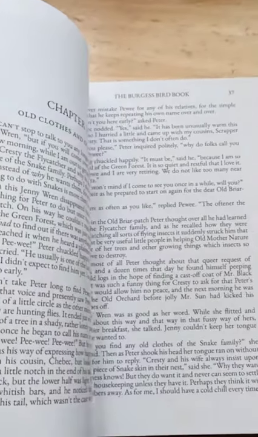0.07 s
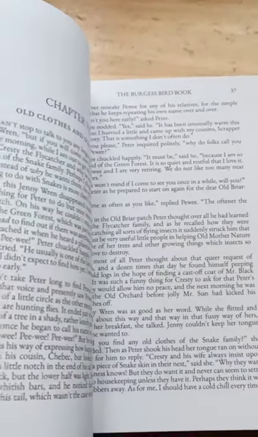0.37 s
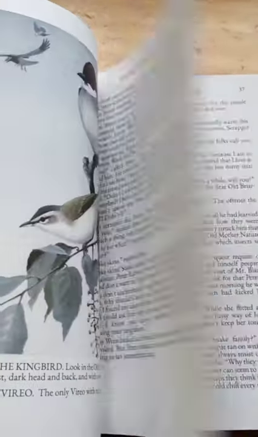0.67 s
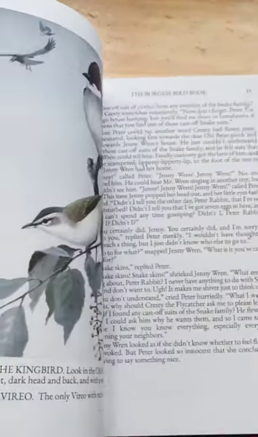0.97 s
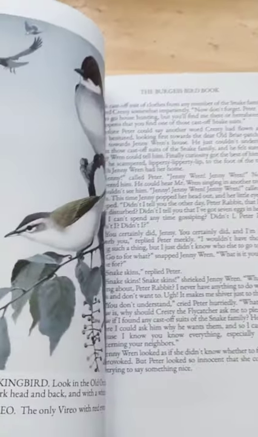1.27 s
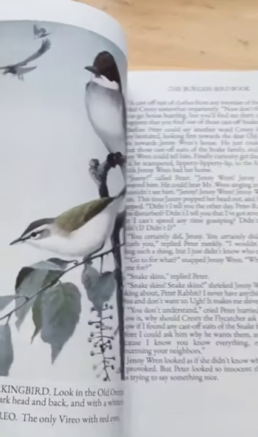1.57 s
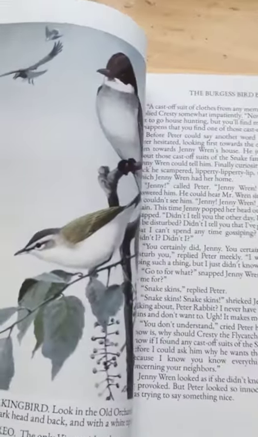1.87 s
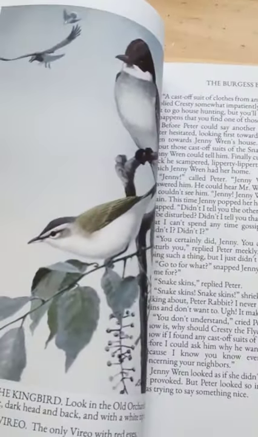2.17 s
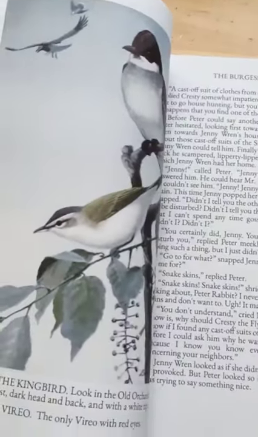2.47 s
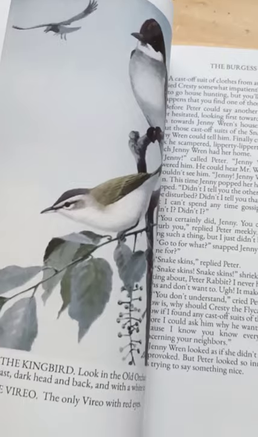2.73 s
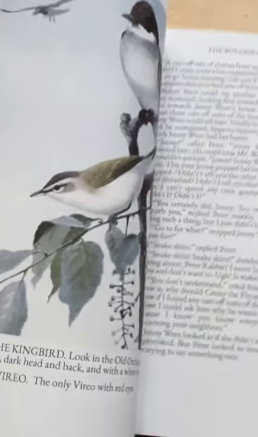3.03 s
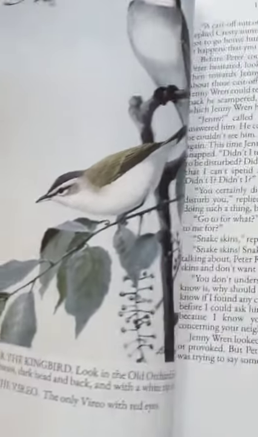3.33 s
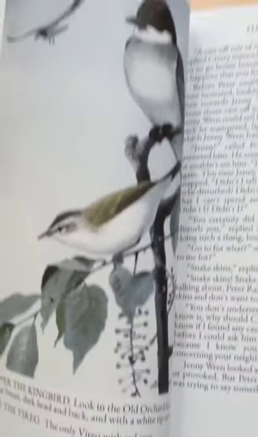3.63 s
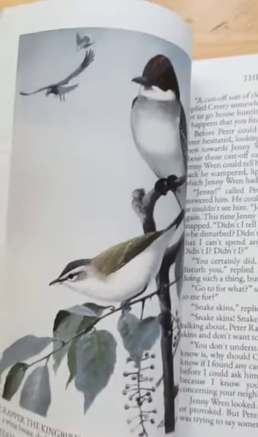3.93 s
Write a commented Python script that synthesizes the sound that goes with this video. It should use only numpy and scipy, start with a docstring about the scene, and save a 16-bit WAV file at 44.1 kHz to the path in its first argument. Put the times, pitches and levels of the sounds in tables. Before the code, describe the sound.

Soft paper sliding and a light tap on a book, with far engines humming outside.

```python
"""Leafing through a book in a quiet room

Up close and very gentle, a page edge catches and ticks free, a finger taps the book and sheets slide softly.
Outside, two distant engines slowly gather speed; only their low tones and rumble come through the walls
and boom in the room's resonances. A steady microphone hiss lies over everything."""
import sys
import numpy as np
from scipy import signal
from scipy.fft import rfft, irfft
from scipy.io import wavfile

SR = 44100
rng = np.random.default_rng(int(sys.argv[2]) if len(sys.argv) > 2 else 0)


def unload_audio(sound):
    """Save the sound as a 16-bit wav file, at the path given as the first command line argument."""
    columns = np.transpose(np.atleast_2d(sound))
    # keep every value between -1 and 1, then stretch to whole-number steps
    steps = np.round(np.clip(columns, -1, 1) * 32767)
    wavfile.write(sys.argv[1], SR, steps.astype(np.int16))


N = 176400
T = np.arange(N) / SR
BIN_HZ = np.arange(N // 2 + 1) * SR / N


def page_tick():
    """A page edge catches and snaps free: tiny bright clicks, a scuff and reflections on the strongest."""
    # Each row: start in seconds, left level in dB, right level in dB.
    snaps = [(.3583, -63, -59), (.3618, -65, -63), (.3640, -58, -44.5), (.3658, -55, -63), (.731, -66, -67)]
    # The edge's ring. Each row: pitch in Hz, relative level in dB, seconds to fall by 60 dB.
    edge_modes = [(3000, -27, 0.0038), (4300, -14, 0.0044), (7120, -4.5, 0.0073), (7650, -9, .009),
                  (10840, -7.5, 0.0022), (14200, -13, 0.0034)]
    # Colour of scuff and reflections. Each row: frequency in Hz, relative level in dB.
    bright = [(1000, -7), (3000, -5), (5500, -10.5), (7200, -2), (9000, -9), (14000, -9.5)]
    strongest_s = snaps[2][0]
    scuff_db, scuff_s = -61.5, 0.0037
    scuff = from_db(scuff_db) * np.exp(-np.abs(T - strongest_s) / scuff_s) * noise(colour(bright))
    return strike(snaps, edge_modes) + scuff + room_tail(strongest_s, bright, level_db=-66, t60=.15)


def finger_tap():
    """A finger lands on the book: one short, dull knock and its reflections."""
    # Each row: start in seconds, left level in dB, right level in dB.
    contacts = [(2.5079, -52.5, -67), (2.5094, -56.5, -52), (2.5118, -60, -56)]
    # The book's ring. Each row: pitch in Hz, relative level in dB, seconds to fall by 60 dB.
    book_modes = [(425, -3, 0.024), (715, -3, 0.018), (1160, -3, 0.0071), (1910, -9, 0.018),
                  (2700, -14, 0.0055), (3800, -13, 0.0045), (6870, -14, 0.0065)]
    # Colour of the reflections. Each row: frequency in Hz, relative level in dB.
    dull = [(250, 1), (600, -5), (1200, -8), (2000, -18), (3800, -17), (5000, -28), (6900, -20),
            (9000, -33), (14000, -42)]
    return strike(contacts, book_modes) + room_tail(contacts[0][0], dull, level_db=-63, t60=.34)


def sliding_sheets():
    """Paper rubs on paper: three layers of grainy noise swell quickly and fade."""
    # Each row: start, attack and length in seconds, then the levels of body, rasp and swish in dB.
    strokes = [(0.41, .03, .07, -84, -77, -89), (0.674, 0.034, 0.1, -78.5, -81, -85),
               (.88, .05, .11, -80, -79, -84), (1.16, 0.051, 0.19, -69, -82, -85),
               (1.34, 0.085, 0.44, -80, -82.5, -87), (1.748, .06, 0.35, -78, -79, -86),
               (2.91, .04, .14, -74.5, -90, -86), (2.995, 0.034, 0.19, -81, -78.5, -90),
               (3.173, 0.056, .26, -73, -74.5, -79.5), (3.39, .05, 0.44, -77.5, -78, -87),
               (3.77, 0.055, .9, -74.5, -78, -85)]
    # Colours of the soft body, dry rasp and high swish. Each row: frequency in Hz, relative level in dB.
    body = [(200, -18), (450, -3.5), (620, 0), (780, 2), (1000, -6.5), (1300, -6), (1700, -11.5),
            (2400, -14), (6000, -40)]
    rasp = [(500, -20), (1500, -2.5), (3000, 6.5), (5000, -10), (9000, -14), (15000, -21)]
    swish = [(3000, -20), (5200, -7), (6900, 1.5), (8800, -12.5), (15000, -13)]
    grain_db = 2
    friction = 0
    for layer, spectrum in enumerate((body, rasp, swish)):
        gain = 0
        for start, attack, length, *levels_db in strokes:
            swell = np.clip((T - start) / attack, 0, 1)
            fade = np.sqrt(np.clip(1 - (T - start) / length, 0, 1))
            gain = gain + from_db(levels_db[layer]) * swell * fade
        friction = friction + gain * noise(colour(spectrum))
    return from_db(grain_db * drift(rate_hz=110)) * friction


def engine():
    """A far engine gathers speed: tones on multiples of the crank rate, the weaker ones swelling in turn."""
    # Each row: time in seconds, crank turns per second.
    speed = [(0, 34.3), (.5, 37.7), (1.15, 41.9), (1.5, 42.6), (2, 45.4), (2.55, 48.3), (2.75, 48),
             (2.95, 51.2), (3.15, 50.8), (3.5, 50.4), (3.85, 52.3), (4, 54)]
    # The throb, once a turn, and the firing tone, twice a turn. Each row: time in seconds, level in dB.
    throb = [(0, -65), (2.6, -71), (2.85, -59), (2.96, -51.5), (3.05, -56), (3.17, -45.5), (3.24, -66),
             (3.45, -49), (3.74, -54), (3.82, -45), (4, -48)]
    firing = [(0, -80), (.55, -57.5), (.8, -56.5), (1.03, -68), (1.22, -51.5), (1.48, -45), (1.63, -48.3),
              (1.97, -49), (2.09, -58.5), (2.5, -66.5), (2.8, -62), (3.3, -66), (3.6, -59), (4, -56.5)]
    # Each row: multiple of the crank rate, resting level in dB, then the swell's peak time in seconds,
    # half-width in seconds and level in dB.
    overtones = [(1.5, -74.5, 0.33, 0.27, -59.5), (3.05, -73.5, 1.35, 0.19, -61),
                 (4, -78, 2.58, 0.18, -62.5), (4, -80, 3.08, 0.21, -63.5), (4, -81, 3.85, 0.16, -66),
                 (5, -80.5, 3.47, 0.31, -64), (5, -84.5, 2.8, 0.16, -66), (6.15, -82, 2.492, 0.35, -72.5),
                 (7.45, -87.5, 3.15, 0.29, -76.5), (8.2, -90, 2.96, 0.143, -74.5),
                 (9.15, -91.5, 1.93, 0.19, -77.5)]
    crank_phase = 2 * np.pi * np.cumsum(in_time(speed)) / SR
    tones = 0
    for multiple, level in ((1, throb), (2, firing)):
        tones = tones + from_db(in_time(level)) * np.sin(multiple * crank_phase + 2 * np.pi * rng.random())
    for multiple, rest_db, peak_s, half_width, swell_db in overtones:
        swell = from_db(swell_db) * np.exp(-((T - peak_s) / half_width) ** 2)
        tones = tones + np.hypot(from_db(rest_db), swell) * rough_tone(multiple * crank_phase)
    return np.sqrt(2) * tones


def second_vehicle():
    """A fainter vehicle pulls away: one rising drone."""
    # Each row: time in seconds, pitch in Hz, level in dB.
    drone = [(0, 252, -79), (.9, 247, -79), (1.27, 249, -69.5), (1.65, 249, -82.5), (1.95, 252, -69.5),
             (2.25, 260, -65.5), (2.6, 264, -66), (2.8, 283, -66), (3, 290, -74.5), (3.25, 293, -76),
             (3.5, 295, -91)]
    times, hz, db = np.transpose(drone)
    phase = 2 * np.pi * np.cumsum(np.interp(T, times, hz)) / SR
    return np.sqrt(2) * from_db(np.interp(T, times, db)) * rough_tone(phase)


def street_rumble():
    """Traffic comes through the walls and booms in the room's resonances; two bands heave separately."""
    # Colour of the traffic. Each row: frequency in Hz, relative level in dB.
    traffic = [(12, -12.5), (28, -9), (42, -1), (60, -0.5), (110, -5.5), (200, -10.5), (280, -14),
               (360, -22.5), (500, -27.5), (800, -45), (2000, -68.5)]
    # Each row: centre in Hz, half-width in Hz, level of the rumble in that resonance in dB.
    room_modes = [(52.7, 5.9, -62), (66.6, 4.6, -67), (83.7, 6.3, -69.5), (99.3, 3.9, -63),
                  (131.3, 14, -65.5), (171.4, 5.9, -68.5), (204, 12, -69.5), (252, 8.2, -72.5),
                  (307, 16, -78), (369.4, 11, -83), (412.3, 9.7, -82.5)]
    # Fader rides for the deep and upper bands. Each row: time in seconds, gain in dB.
    deep_ride = [(0, 9), (.15, 2), (.3, 4), (.5, 3.5), (.7, -3), (1.25, 1.5), (1.58, 4.5), (1.72, 2),
                 (2.1, -2.5), (2.55, -4), (2.75, 4.5), (3.17, 0.5), (3.28, -0.5), (4, 0.5)]
    upper_ride = [(0, -1), (.55, -0.5), (.7, -1.5), (1.08, -3), (1.27, 2.5), (1.5, -1), (2.4, -1.5),
                  (2.8, 0.5), (3.16, 3), (3.27, -0.5), (3.5, -1.5), (3.87, 0.5), (4, -2)]
    traffic_db, crossover_hz = -57, 76.6
    power = (from_db(traffic_db) * unit_rms(colour(traffic))) ** 2
    for centre, half_width, db in room_modes:
        resonance = 1 / (1 + ((BIN_HZ - centre) / half_width) ** 2)
        power = power + (from_db(db) * unit_rms(resonance)) ** 2
    deep_share = 1 / (1 + (BIN_HZ / crossover_hz) ** 12)
    rumble = 0
    for share, ride in ((deep_share, deep_ride), (1 - deep_share, upper_ride)):
        band = np.sqrt(np.mean(power * share)) * noise(np.sqrt(power * share))
        rumble = rumble + band * from_db(in_time(ride))
    return rumble


def hiss():
    """Room air and microphone hiss, thin in the bass and wavering very slightly."""
    # Colour ahead of the low cut. Each row: frequency in Hz, relative level in dB.
    air = [(290, -22.5), (500, -4), (569, 0), (887, -4.5), (953, -5.5), (1220, -7.5), (2010, -8.5),
           (2160, -10.5), (2320, -8), (4180, -13), (4820, -19.5), (6900, -16), (7740, -18.5),
           (14500, -18.5), (15400, -18.5)]
    level_db, waver_db, low_cut_hz = -73, .45, 403
    low_cut = 1 - 1 / (1 + (BIN_HZ / low_cut_hz) ** 2)
    return from_db(level_db + waver_db * drift(rate_hz=6)) * noise(colour(air) * low_cut)


def strike(contacts, modes):
    """Each contact sets the modes ringing, with its own strength left and right."""
    clicks = np.full((2, N), 1e-18)
    for start, left_db, right_db in contacts:
        clicks[:, int(start * SR)] += from_db([left_db, right_db])
    ring = 0
    for k, (hz, db, t60) in enumerate(modes):
        decay, angle = from_db(-60 / (t60 * SR)), 2 * np.pi * hz / SR
        mode = signal.lfilter([0, np.sin(angle)], [1, -2 * decay * np.cos(angle), decay * decay], clicks)
        ring = ring + (-1) ** k * from_db(db) * mode  # neighbouring modes swing opposite ways
    return ring


def room_tail(start, spectrum, level_db, t60):
    """Diffuse reflections after a contact, falling 60 dB in t60 seconds."""
    fall_db = -60 * np.maximum(T - start, 0) / t60
    return (T > start) * from_db(level_db + fall_db) * noise(colour(spectrum))


def rough_tone(phase):
    """A far engine tone wavers slowly and trembles quickly on its way through the street."""
    waver_db = 1.3 * drift(rate_hz=2.5)
    tremble_db = 1.8 * drift(rate_hz=18)
    wandering_phase = phase + 2 * np.pi * rng.random() + .5 * drift(rate_hz=2.5)
    return from_db(waver_db + tremble_db) * np.sin(wandering_phase)


def noise(gain):
    """Stereo noise at unit rms, shaped by a gain per frequency: centred in the bass, wide on top."""
    # Each row: frequency in Hz, correlation between left and right.
    likeness = [(60, 0.98), (110, 0.84), (200, 0.97), (380, 0.62), (700, 0.13), (1290, -0.046),
                (15000, -0.033)]
    alike = np.clip(across_bins(likeness), -1, 1)
    mid, side = rfft(rng.standard_normal((2, N)))
    left_right = np.sqrt(1 + alike) * mid + np.sqrt(1 - alike) * side * [[1], [-1]]
    return unit_rms(irfft(gain * left_right, N))


def drift(rate_hz):
    """A smooth random wander with a spread of 1."""
    hop, run_in = 40, 2000  # samples per step, steps to settle
    pole = np.exp(-2 * np.pi * hop * rate_hz / SR)
    steps = rng.standard_normal(N // hop + run_in + 2)
    wander = signal.lfilter([1], [1, -2 * pole, pole * pole], steps)[run_in:]
    return np.interp(np.arange(N) / hop, np.arange(len(wander)), unit_rms(wander))


def colour(points):
    """Gain per frequency from a spectrum in dB."""
    return from_db(across_bins(points))


def across_bins(points):
    """A curve through the points on a log-frequency axis."""
    hz, value = np.transpose(points)
    return np.interp(np.log(BIN_HZ + 0.0011), np.log(hz), value)


def in_time(points):
    """An automation curve at every sample."""
    return np.interp(T, *np.transpose(points))


def from_db(db):
    """Decibels to gain."""
    return 10 ** (np.asarray(db) / 20)


def unit_rms(x):
    """Scale to an rms of 1."""
    return x / np.sqrt(np.mean(x ** 2) + 1e-30)


def scene():
    """The book in front, the street behind the walls, hiss over both."""
    book = page_tick() + finger_tap() + sliding_sheets()
    return book + engine() + second_vehicle() + street_rumble() + hiss()


def record(dry):
    """A click-free fade-in and a steep cut of the very top."""
    fade_in_s, cutoff_hz = .012, 15550
    fade_in = np.sin(np.pi / 2 * np.minimum(T / fade_in_s, 1)) ** 2
    low_pass = signal.ellip(12, .1, 80, cutoff_hz, fs=SR, output="sos")
    return signal.sosfilt(low_pass, dry * fade_in)


dry = scene()
out = record(dry)
unload_audio(out)
```